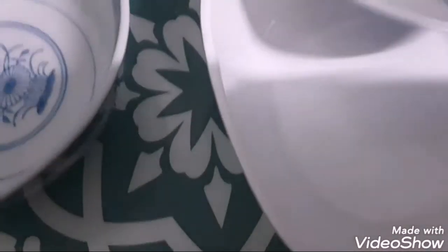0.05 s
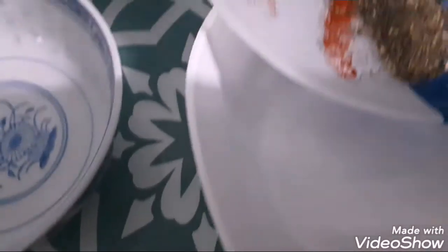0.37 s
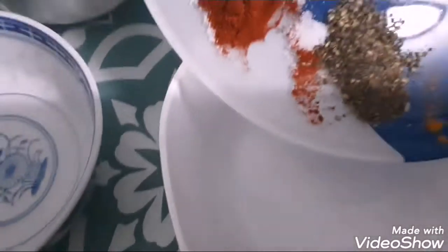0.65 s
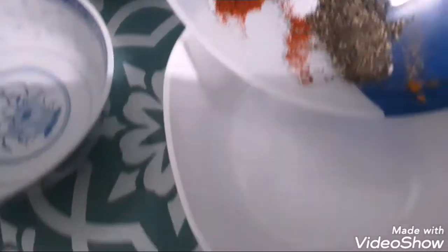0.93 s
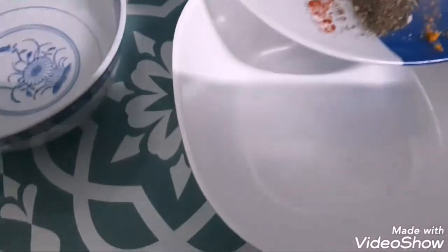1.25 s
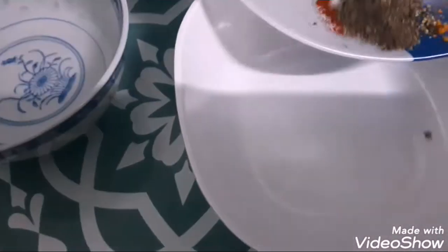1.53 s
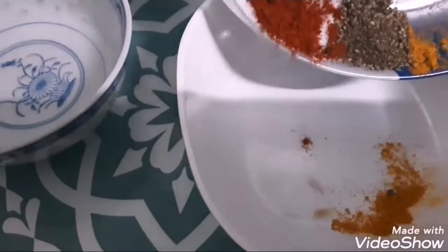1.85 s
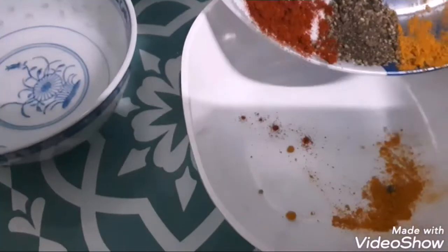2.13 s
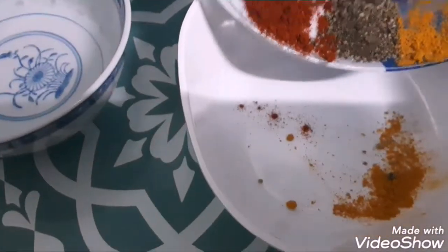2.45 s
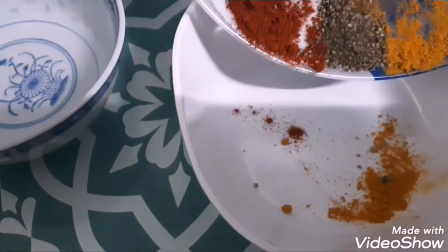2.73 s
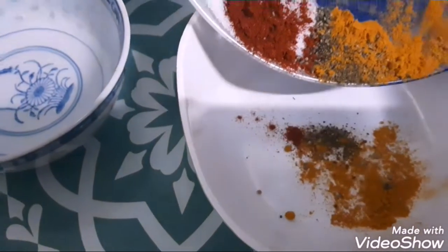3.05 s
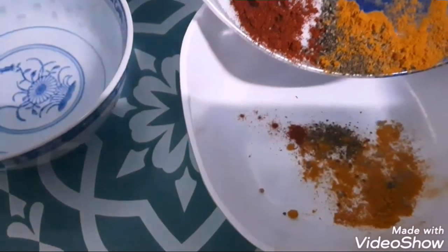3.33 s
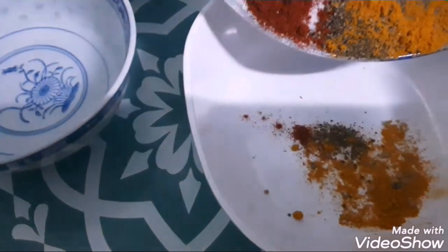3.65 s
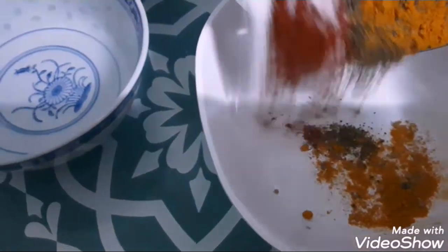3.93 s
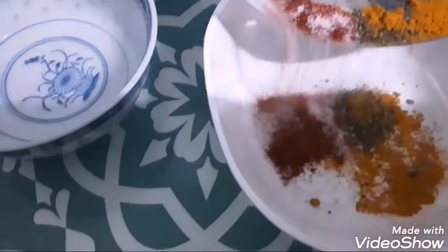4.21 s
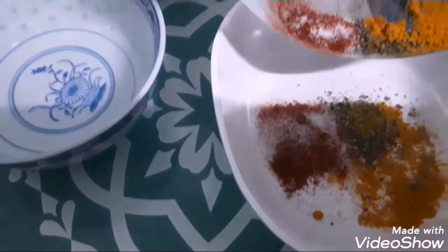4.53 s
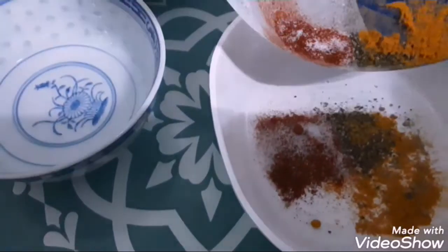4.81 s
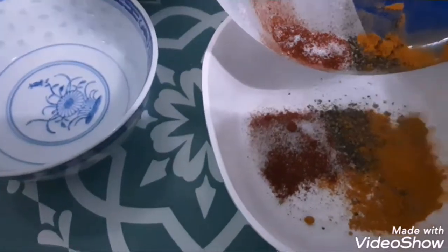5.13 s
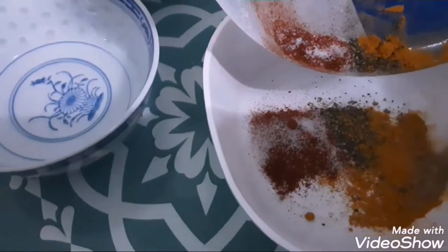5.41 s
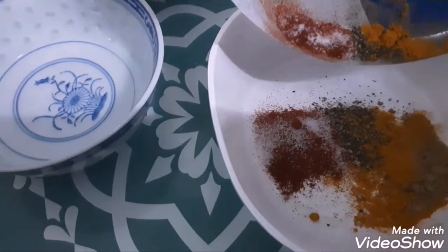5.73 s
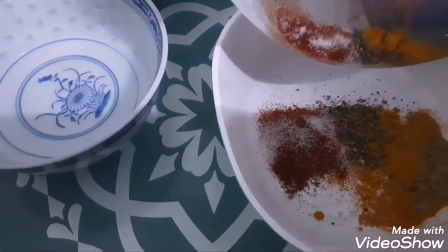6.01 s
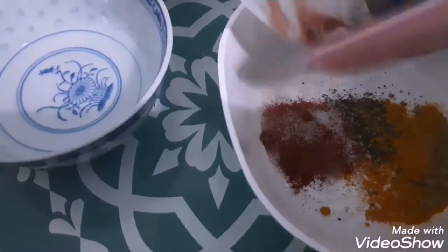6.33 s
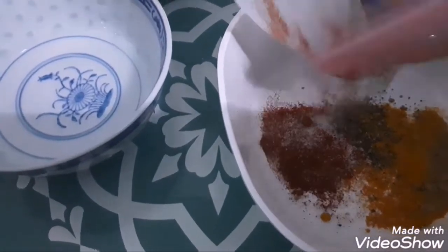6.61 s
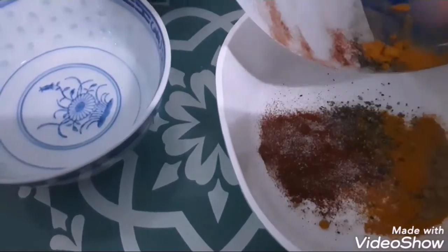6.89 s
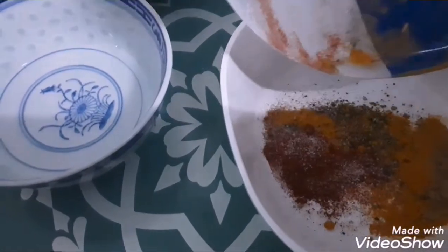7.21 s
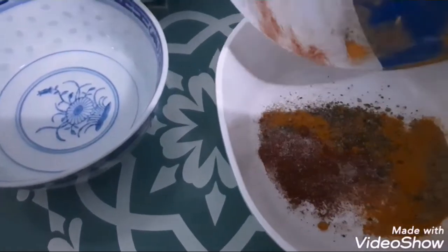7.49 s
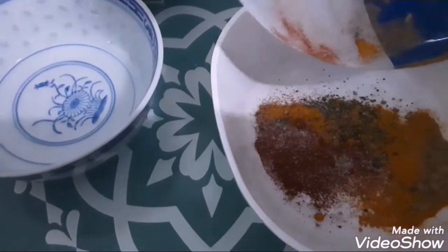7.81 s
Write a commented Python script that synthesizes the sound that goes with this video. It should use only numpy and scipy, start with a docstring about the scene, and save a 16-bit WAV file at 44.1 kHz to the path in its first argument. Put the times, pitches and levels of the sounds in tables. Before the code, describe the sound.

Ground spices slide from a plate into a bowl with soft, dry hisses, heard up close in a small kitchen. Handling rustle comes first, then a series of light, ringing knocks of dish on dish. After a short raspy slip of powder it grows quieter, with tiny ticks and a finger sticking and slipping on the plate, until the loudest knock sounds. Faint peeps and a low rumble sit underneath.

```python
"""In a small kitchen, ground spices are tipped from a plate into a bowl, close by.
The plate is picked up with a rustle and knocks against the dish, so crockery and table top ring.
Powder slides off in hissing trickles, and the falling grains make the bowl ring faintly.
A finger brushes out the rest, sticking and slipping on the glaze.
A low hum, a rumble and a few faint peeps lie behind."""
import sys
import numpy as np
from scipy import signal
from scipy.fft import rfft, irfft, next_fast_len
from scipy.io import wavfile
from scipy.ndimage import uniform_filter1d, map_coordinates

SR = 44100
rng = np.random.default_rng(int(sys.argv[2]) if len(sys.argv) > 2 else 0)


def log_audio(samples):
    """Write samples as a 16-bit WAV file to the path given in sys.argv[1]."""
    # one column per channel
    frames = np.atleast_2d(samples).T
    # limit to full scale, then quantise
    limited = np.clip(frames, -1, 1)
    pcm = np.round(limited * 32767).astype(np.int16)
    wavfile.write(sys.argv[1], SR, pcm)


N = 350595
T = np.arange(SR // 2) / SR  # seconds within one short sound

# Levels are relative: the functions scale them further. A ring time (t60) is the time to fade by 60 dB.
# powder running into the bowl: (middle [s], half length [s], landing level [dB], hiss level [dB])
POURS = [(1.67, 0.21, -73, -62), (1.99, 0.18, -67.5, -73), (2.978, 0.081, -59.5, -65.5),
         (4.016, 0.12, -61, -59.5), (4.15, 0.13, -66.5, -70)]
# tone colour of running powder: (frequency [Hz], level [dB])
POWDER_COLOUR = [(1470, -28.5), (2500, -8), (3180, -6), (3550, -6), (4370, -10.5), (5310, -6), (6810, -3.5),
                 (8460, -11.5), (11400, -7.5), (14900, -10), (16000, -20)]
# notes of the bowl where grains land: (frequency [Hz], width [Hz], level [dB])
BOWL_NOTES = [(1910, 52, 1), (3254, 100, -3.5), (4900, 170, -4.5), (5696, 69, -3), (6800, 68, -8.5),
              (7400, 120, -1), (8000, 180, -3.5), (8350, 200, -13), (9680, 26, -12.5), (10570, 160, 0),
              (11410, 33, -1), (11500, 97, -3), (12200, 69, -2), (14000, 51, -10.5)]
# a patch of powder slips or is swept: (time [s], length [s], level [dB], brightness [dB/octave])
SLIPS = [(0.092, 0.019, -41.5, 3), (0.226, 0.04, -48.5, 5), (0.424, 0.017, -44, 1), (2.844, 0.11, -55, 1.5),
         (3.305, 0.07, -58, 3.5), (3.644, 0.069, -62, 8.5), (4.382, 0.03, -36.5, -0.5),
         (4.41, 0.053, -34, 0), (5.383, 0.055, -60, 2)]
# tone colour of dry powder pushed along: (frequency [Hz], level [dB])
SCRAPE_COLOUR = [(60, -30.5), (110, -2.5), (450, -11), (800, -14.5), (1500, -15), (2200, -6), (3200, -3.5),
                 (4200, -7.5), (5300, -4.5), (7800, -5), (9000, -12), (12500, -8), (16000, -15.5)]
# notes in the rasp of swept powder: (frequency [Hz], width [Hz], level [dB])
RASP_NOTES = [(3220, 38, -2.5), (4100, 97, -4.5), (4570, 190, -1.5), (5000, 130, -1), (5390, 120, -3.5),
              (7260, 30, 1)]
# the plate shifts in the hand: (time [s], length [s], rub level [dB], hiss level [dB])
SHIFTS = [(0.0, 0.23, -49, -44), (0.241, 0.29, -48.5, -51.5), (1.348, 0.23, -60, -66.5),
          (2.817, 0.09, -57.5, -76)]
# faint rustle while the plate is held: (time [s], rub level [dB], hiss level [dB])
HOLDING_LEVELS = [(0.75, -63, -64), (1.09, -64.5, -73.5), (1.61, -58.5, -64), (2.25, -71, -71.5),
                  (2.69, -65.5, -77), (4.14, -65.5, -70.5), (4.84, -83.5, -82), (7.95, -85.5, -81.5)]
# tone colour of the rubbed plate: (frequency [Hz], level [dB])
RUB_COLOUR = [(240, -39.5), (400, -9.5), (671, 0), (1240, 2.5), (2100, -0.5), (2260, -5.5), (3530, -9.5),
              (4270, -8.5), (5000, -7), (6500, -42), (11000, -120)]
# notes of the rubbed plate: (frequency [Hz], width [Hz], level [dB])
PLATE_NOTES = [(845, 32, -8.5), (1152, 41, -9), (1503, 26, -3.5), (1865, 78, -4.5), (2270, 35, 5),
               (2487, 38, 6), (3230, 23, -10), (3940, 64, -2), (4933, 31, -11), (5750, 66, 2.5),
               (5900, 25, 0.5), (7480, 55, 6), (7600, 100, -2.5), (9700, 34, -2)]
# the plate hits the dish: (time [s], level [dB], table thud [dB], rim tone [dB], high clink [dB],
# treble crack [dB], hardness [dB/octave], chatter length [s])
KNOCKS = [(0.478, -24, -22, -22, -27.5, -20, 1.5, 0.0022), (1.655, -21, -25, -10.5, -28, -13.5, -1, 0.017),
          (2.532, -19, -23, -17.5, -24, -17, -1, 0.013), (2.82, -34.5, -20, -23.5, -25, -24, -0.5, 0.0066),
          (3.498, -24.5, -24, -23.5, -36.5, -21, -2.5, 0.0123),
          (7.05, -10, -24, -26.5, -35.5, -15, 2, 0.02)]
# notes of struck crockery: (frequency [Hz], level [dB], ring time [s])
CROCKERY_NOTES = [(597, -8, 0.14), (680, -3.5, 0.15), (832, -5, 0.15), (1046, 3, 0.064), (1066, -3.5, .13),
                  (1140, -10, .16), (1230, -0.5, .14), (1305, -1, .14), (1600, -11, .12), (1770, -4.5, .16),
                  (1860, -3.5, 0.055), (2010, -6, 0.082), (2154, -6.5, 0.14), (2930, -10, 0.15),
                  (2966, -9, 0.12), (3082, -12, 0.072), (5600, -15, 0.16), (5970, -17, 0.08),
                  (7030, -17.5, 0.18), (7752, -23, .1)]
# tone colour of clacking dishes: (frequency [Hz], level [dB])
CLACK_COLOUR = [(210, -38.5), (350, -13.5), (474, -20), (640, -3.5), (850, -5), (1260, -3), (1550, -7),
                (1950, -5), (2600, -9), (3050, -10.5), (3500, -15), (4100, -14), (5300, -16.5),
                (7700, -18.5), (9000, -29.5), (12000, -29), (16000, -44.5)]
# low notes of the table top: (frequency [Hz], level [dB], ring time [s])
TABLE_NOTES = [(106, -10.5, 0.19), (125.7, 1, 0.32), (179.3, -3, 0.27), (235, -3.5, 0.15), (248, 0, .17),
               (297, -10.5, 0.2)]
# tone colour of a thud on the table top: (frequency [Hz], level [dB])
THUD_COLOUR = [(40, -21), (90, -6.5), (130, 1.5), (155, -5.5), (180, -1), (255, 3), (340, -7.5), (480, -17),
               (900, -64)]
# the plate grazes the dish: (time [s], length [s], level [dB], brightness [dB/octave])
GRAZES = [(0.333, 0.025, -44.5, -2), (0.6, 0.036, -51.5, -0.5), (1.251, 0.14, -54, -6.5),
          (1.983, 0.045, -53, -7.5), (2.279, 0.04, -59.5, -7.5), (3.075, 0.04, -55.5, -3),
          (3.83, 0.03, -56, -6)]
# a finger wipes the glaze: (time [s], length [s], level [dB])
WIPES = [(5.157, 0.031, -59), (6.252, 0.037, -57.5), (6.572, 0.024, -58), (6.988, 0.026, -59.5),
         (7.35, 0.011, -57.5), (7.381, 0.0115, -57.5), (7.665, 0.022, -53), (7.887, 0.019, -52)]
# tone colour of slipping on the bare plate: (frequency [Hz], level [dB])
GLAZE_COLOUR = [(200, -16), (480, -8.5), (720, 0.5), (1400, 2.5), (3000, -8.5), (6000, -1), (7700, -4.5),
                (9000, -9), (12000, -2.5), (16000, -17)]
# light, hard taps: (time [s], level [dB], dish level [dB], chatter length [s])
TICKS = [(1.578, -43, -34, 0.0022), (1.6863, -48.5, -4, 0.0022), (3.0, -57.5, -15, 0.0034),
         (5.068, -65, -10.5, 0.016), (5.5823, -51.5, -2.5, 0.0041), (5.622, -57, 1, 0.0098)]
# tone colour of such a tap: (frequency [Hz], level [dB])
TICK_COLOUR = [(1180, -41.5), (2000, -11.5), (3550, -7.5), (4530, 0), (7910, 0.5), (9250, -9),
               (10800, -0.5), (16000, -14)]
# soft bumps of handling: (time [s], level [dB], pitch [Hz])
BUMPS = [(0.0, -41, 107), (0.225, -37, 142), (0.302, -35.5, 136), (0.388, -37.5, 118), (0.8, -38, 235),
         (0.834, -47, 166), (1.972, -43.5, 105), (1.989, -50, 174), (4.41, -49, 230), (4.45, -51.5, 114.5)]
# faint peeps and squeaks: (time [s], length [s], pitch [Hz], level [dB], width [share of the pitch])
PEEPS = [(0.01, 0.043, 1040, -44, 0.062), (0.135, 0.033, 2720, -43.5, 0.37),
         (0.335, 0.022, 2980, -41.5, 0.22), (0.558, 0.011, 3120, -48, 0.059),
         (0.615, 0.027, 1260, -49.5, 0.089), (0.864, 0.017, 1420, -52, 0.1),
         (1.478, 0.035, 1130, -56, 0.05), (3.238, 0.094, 1330, -59.5, 0.21),
         (5.011, 0.022, 1490, -68, 0.12), (5.388, 0.05, 1726, -64.5, 0.06),
         (5.992, 0.02, 1890, -73.5, 0.03), (6.308, 0.014, 2070, -56.5, 0.071),
         (6.787, 0.066, 1174, -72.5, 0.02), (7.278, 0.033, 1330, -71, 0.025)]
# how long the kitchen echoes: (frequency [Hz], ring time [s])
KITCHEN_RING_TIMES = [(120, 0.15), (400, 0.31), (2000, 0.24), (6000, 0.23), (14000, 0.15)]
# loudness of the room's low rush: (time [s], level [dB])
RUSH_LEVELS = [(0.0, -56.5), (0.38, -53), (0.55, -65.5), (1.15, -62.5), (2.45, -71), (2.68, -68),
               (5.27, -68), (6.0, -83.5), (7.22, -77.5), (7.44, -84), (7.95, -81)]
# tone colour of that rush: (frequency [Hz], level [dB])
RUSH_COLOUR = [(65, -35.5), (110, -3.5), (171, -9.5), (230, -1), (420, -17.5), (456, -13), (809, -19),
               (1000, -26), (1300, -48.5), (2200, -120)]
# tone colour of the steady rumble: (frequency [Hz], level [dB])
RUMBLE_COLOUR = [(20, -39.5), (40, -15), (58, 4), (75, -7.5), (100, -2.5), (135, -11), (230, -14),
                 (330, -20), (500, -25), (900, -48)]
# faint stereo spread that follows the sound's loudness: (frequency [Hz], level [dB])
SIDE_SPREAD_COLOUR = [(120, -42.5), (500, -34.0), (2500, -49.0), (6000, -32.5), (12000, -18.5)]
# faint, steady stereo hiss: (frequency [Hz], level [dB])
SIDE_HISS_COLOUR = [(50, 5.5), (500, 5.0), (3000, 1.5), (8000, 0.5), (15000, 6)]

TOP_HZ = 15800


def pours():
    """Falling grains ring the bowl where they land."""
    flow = sum(amp(db) * stream(s, half) for s, half, db, _ in POURS)
    fine = resonate(noise(POWDER_COLOUR, N, grain_db=5), BOWL_NOTES, share=0.61)
    coarse = resonate(noise(RUB_COLOUR, N, grain_db=9), BOWL_NOTES, share=0.9)
    return flow * (fine + amp(-6) * coarse)


def stream(middle, half):
    """Loudness curve of a stream of powder that swells and thins."""
    return np.exp(-((np.arange(N) / SR - middle) / half) ** 2)


def slips():
    """Dry powder moves all at once with a raspy hiss."""
    out = np.zeros(N)
    for s, length, db, bright_db in SLIPS:
        grit = resonate(noise(SCRAPE_COLOUR, grain_db=1.5), RASP_NOTES, share=0.2)
        add(out, s, amp(db) * stroke(grit, length, bright_db))
    return out


def sliding():
    """The plate rubs in the hand while fine grains run over it; shifts and pours make it louder."""
    rub_db, hiss_db = curves(HOLDING_LEVELS)
    rub_power, hiss_power = amp(rub_db - 1.3) ** 2, amp(hiss_db + 0.1) ** 2
    for s, length, shift_rub_db, shift_hiss_db in SHIFTS:
        movement = hand_shift(s, length)
        rub_power += (amp(shift_rub_db) * movement) ** 2
        hiss_power += (amp(shift_hiss_db) * movement) ** 2
    hiss_power += sum((amp(db) * stream(s, half)) ** 2 for s, half, _, db in POURS)
    rub = patchy(resonate(noise(RUB_COLOUR, N, grain_db=2.5), PLATE_NOTES, share=0.12), depth_db=2.5)
    hiss = patchy(resonate(noise(POWDER_COLOUR, N, grain_db=1.5), BOWL_NOTES, share=0.054), depth_db=3.5)
    grip = amp(1.5 * wobble(25, N))
    flicker = amp(0.76 * wobble(26, N))
    return np.sqrt(rub_power) * grip * rub + np.sqrt(hiss_power) * flicker * hiss


def hand_shift(s, length, rise=0.02, t60=0.407):
    """Loudness curve of a hand movement that builds up, holds and dies away."""
    t = np.maximum(np.arange(N) / SR - s, 0)
    return (1 - np.exp(-t / rise)) * amp(-60 * np.maximum(t - length, 0) / t60)


def knocks():
    """The rims chatter for some milliseconds; crockery and table top ring on."""
    out = np.zeros(N)
    for s, db, thud_db, rim_db, clink_db, crack_db, hard_db, chatter in KNOCKS:
        contact = resonate(tilted(noise(CLACK_COLOUR, grain_db=1.5), hard_db), PLATE_NOTES, share=0.017)
        treble = filtered(contact, lambda hz: 1 - 1 / (1 + (hz / 3700) ** 8))
        clack_shape = (fade(0.076, chatter) + amp(-5) * fade(0.2)) * fade_in(0.0015)
        clack = punch((contact - treble) * clack_shape)
        crack = punch(treble * (fade(0.018, chatter / 3) + amp(-10.5) * fade(0.21)))
        body = crockery_ring(hard_db)
        rim = punch(note(2494, t60=0.12, rise=0.006))
        clink = punch(note(4120, t60=0.1, rise=0.0015))
        impact = amp(-12) * clack + amp(crack_db - 5) * crack
        ringing = amp(-16) * body + amp(rim_db + 4) * rim + amp(clink_db) * clink
        add(out, s, amp(db) * (impact + ringing + amp(thud_db) * table_thud()))
    return out


def crockery_ring(hard_db):
    """Struck dishes ring with many notes at once; a harder blow favours the high ones."""
    ring = np.zeros(len(T))
    for hz, db, t60 in CROCKERY_NOTES:
        strength = amp(db + hard_db * np.log2(hz / 1000) + rng.normal(0, 1.5))
        ring += strength * note(hz, t60, rise=0.0018)
    return punch(ring)


def table_thud():
    """The table top answers a knock with a short boom and a dull puff of noise."""
    notes = sum(amp(db) * note(hz, t60, rise=0.022) for hz, db, t60 in TABLE_NOTES)
    boom = punch(notes * fade(0.1, hold=0.11))
    dull = punch(noise(THUD_COLOUR) * fade(0.18) * fade_in(0.0099))
    return punch(boom + amp(-1) * dull)


def grazes():
    """The rim drags briefly over the dish, partly cushioned by powder."""
    out = np.zeros(N)
    for s, length, db, bright_db in GRAZES:
        add(out, s, amp(db) * stroke(friction(bare_share=0.54), length, bright_db))
    return out


def finger_wipes(touch_s=0.026, bare_share=0.9):
    """The finger lands lightly, then sticks and slips over the glaze and sets the plate ringing."""
    out = np.zeros(N)
    for s, length, db in WIPES:
        touch = stroke(friction(bare_share), touch_s, bright_db=4)
        add(out, s - touch_s, amp(db - 15.5) * touch)
        judder = amp(3.5 * wobble(220, len(T)))
        wipe = stroke(judder * friction(bare_share), length, bright_db=0.6, rise=0.004)
        add(out, s, amp(db) * wipe)
    return out


def friction(bare_share):
    """Rubbing gives a plain hiss through powder, and a gritty ring on bare glaze."""
    powder = noise(SCRAPE_COLOUR, grain_db=1)
    glaze = resonate(noise(GLAZE_COLOUR, grain_db=3.5), PLATE_NOTES, share=0.75)
    return np.sqrt(1 - bare_share) * powder + np.sqrt(bare_share) * glaze


def stroke(grit, length, bright_db, rise=0.011):
    """One run of tiny slips: the pressure rises, holds and lets go."""
    pressure = fade_in(rise) * (0.42 * fade(0.03, length) + 0.55 * fade(0.088, length))
    return pressure * tilted(grit, bright_db)


def ticks():
    """A light tap gives a gritty snap with a little of the dish under it."""
    out = np.zeros(N)
    for s, db, body_db, chatter in TICKS:
        grit = resonate(noise(TICK_COLOUR, grain_db=3), BOWL_NOTES, share=0.13)
        snap = punch(grit * (fade(0.034, chatter) + amp(-3.5) * fade(0.098)))
        body = punch(noise(CLACK_COLOUR) * fade(0.14))
        add(out, s, amp(db) * (snap + amp(body_db) * body))
    return out


def bumps(t60=0.23):
    """Soft bumps stir only the low notes."""
    out = np.zeros(N)
    for s, db, hz in BUMPS:
        dull = noise(THUD_COLOUR) * fade(t60) * fade_in(0.0044)
        add(out, s, amp(db) * (note(hz, t60, rise=0.001) + amp(-10.5) * dull))
    return out


def peeps():
    """Brief, rough peeps: noise squeezed around one pitch, with a soft tail."""
    out = np.zeros(N)
    for s, length, pitch, db, width in PEEPS:
        band = filtered(rng.standard_normal(len(T)), lambda hz: 1 / (1 + ((hz / pitch - 1) / width) ** 2))
        tone = unit(band / np.sqrt(abs(signal.hilbert(band))))  # partly evens out the loudness
        add(out, s, amp(db) * tone * fade_in(0.004) * fade(0.18, length))
    return out


def kitchen_echo(x):
    """The walls throw the sound back; the middle pitches last longest."""
    hz, t, bands = signal.stft(rng.standard_normal(len(T)), SR, nperseg=256)
    decay = amp(-60 * t / along(KITCHEN_RING_TIMES, hz)[:, None])
    tail = signal.istft(bands * decay, SR, nperseg=256)[1]
    delayed = np.pad(x, (300, 0))
    return signal.fftconvolve(delayed, tail / np.linalg.norm(tail))[:N]


def background():
    """The room's low rush, a steady rumble and a 100 Hz mains hum."""
    rush_db, = curves(RUSH_LEVELS)
    hum = unit(np.sin(2 * np.pi * 100 * np.arange(N) / SR + 0.21 * wobble(1.6, N)))
    rush = amp(rush_db + 1.5) * noise(RUSH_COLOUR, N)
    return rush + amp(-74) * noise(RUMBLE_COLOUR, N) + amp(-75.5) * hum


def noise(colour, size=len(T), grain_db=0):
    """Noise with a tone colour; grain_db clumps it into tiny contacts of uneven size."""
    contacts = rng.standard_normal(size) * amp(grain_db * wobble(900, size))
    return unit(filtered(contacts, lambda hz: amp(along(colour, hz))))


def note(hz, t60, rise):
    """One pure note that builds up and rings out."""
    return np.sin(2 * np.pi * (hz * T + rng.random())) * fade(t60) * fade_in(rise)


def resonate(x, notes, share):
    """Let a share of the power of x ring at an object's own notes."""
    def response(hz):
        return sum(amp(db) * 1j * hz * width / (pitch ** 2 - hz ** 2 + 1j * hz * width)
                   for pitch, width, db in notes)
    return unit(np.sqrt(1 - share) * unit(x) + np.sqrt(share) * unit(filtered(x, response)))


def patchy(x, depth_db):
    """The contact keeps shifting, so that pitch bands swell and sink on their own."""
    bands = signal.stft(x, nperseg=512)[2]
    swells = uniform_filter1d(rng.standard_normal(bands.shape), size=7, axis=0)  # smooth over pitch
    swells = uniform_filter1d(swells, size=8, axis=1)  # and over time
    return unit(signal.istft(bands * amp(depth_db * unit(swells)), nperseg=512)[1][:len(x)])


def tilted(x, slope_db):
    """Brighten or dull by slope_db per octave between 500 Hz and 12 kHz."""
    return unit(filtered(x, lambda hz: amp(slope_db * np.log2(np.clip(hz, 500, 12000)))))


def filtered(x, response):
    """Turn each frequency of x up or down by response(hz)."""
    size = x.shape[-1]
    padded = next_fast_len(size + 8192)
    return irfft(rfft(x, padded) * response(np.fft.rfftfreq(padded, 1 / SR)), padded)[..., :size]


def fade_in(rise):
    """Climb from silence, about two thirds of the way in rise seconds."""
    return 1 - np.exp(-T / rise)


def fade(t60, hold=0):
    """Full level for hold seconds, then down 60 dB every t60 seconds."""
    return amp(-60 * np.maximum(T - hold, 0) / t60)


def wobble(rate, size):
    """A smooth curve through rate random points a second."""
    points = rng.standard_normal(int(size * rate / SR) + 4)
    return map_coordinates(points, [np.arange(size) * rate / SR])


def along(points, hz):
    """Read between (frequency, value) points, with octaves evenly spaced."""
    frequencies, values = np.transpose(points)
    return np.interp(np.log(hz + 1), np.log(frequencies + 1), values)


def curves(rows):
    """One value per sample for each column after the time."""
    times, *columns = np.transpose(rows)
    return [np.interp(np.arange(N) / SR, times, column) for column in columns]


def amp(db):
    """Turn decibels into a factor to multiply by."""
    return 10 ** (np.asarray(db) / 20)


def unit(x):
    """Scale to an average level (rms) of 1."""
    return x / np.sqrt(np.mean(x ** 2) + 1e-20)


def punch(x):
    """Scale so that the first 30 ms have an average level of 1."""
    return x / np.sqrt(np.mean(x[:round(0.03 * SR)] ** 2) + 1e-20)


def add(track, s, sound):
    """Mix a sound into the track at s seconds."""
    part = track[max(round(s * SR), 0):][:len(sound)]
    part += sound[:len(part)]


def scene():
    """Everything is heard from the middle; only a trace differs between the ears."""
    blows = knocks()
    near = blows + ticks() + bumps() + slips() + grazes() + finger_wipes() + peeps()
    middle = near + amp(-14) * kitchen_echo(near) + pours() + sliding() + background()
    # a smeared copy gives a faint stereo spread that follows the sound's loudness
    side_spread = filtered(kitchen_echo(middle), lambda hz: amp(along(SIDE_SPREAD_COLOUR, hz)))
    side = side_spread + amp(-36.5) * kitchen_echo(blows) + amp(-77) * noise(SIDE_HISS_COLOUR, N)
    return np.array([middle + side, middle - side])


def record(dry):
    """Cut away everything above TOP_HZ."""
    return filtered(dry, lambda hz: hz < TOP_HZ)


dry = scene()
out = record(dry)
log_audio(out)
```